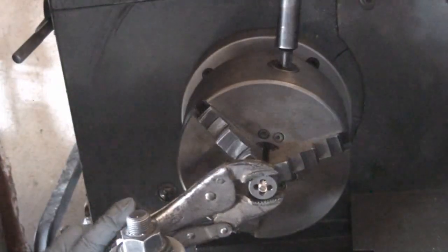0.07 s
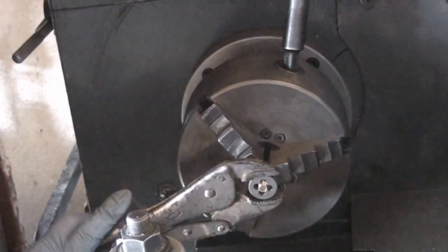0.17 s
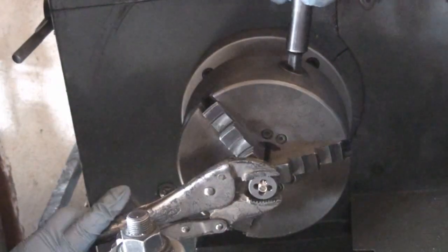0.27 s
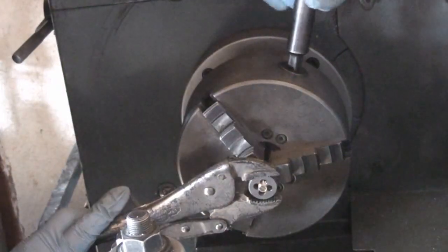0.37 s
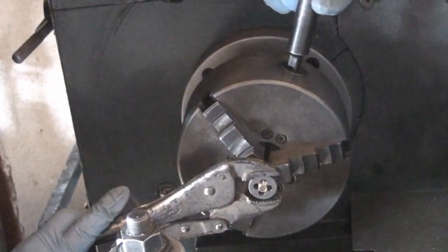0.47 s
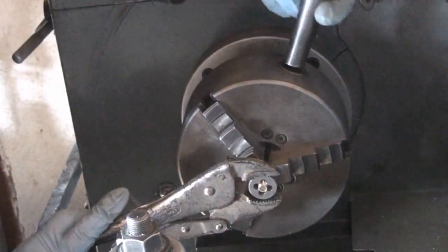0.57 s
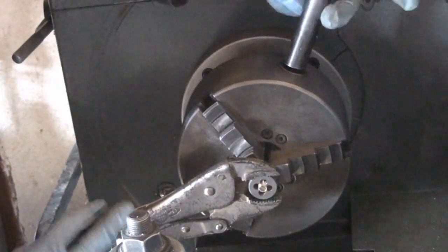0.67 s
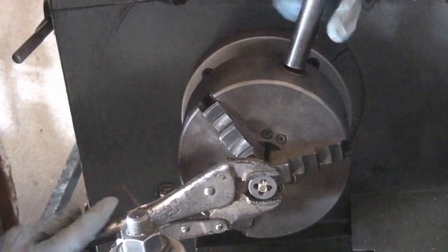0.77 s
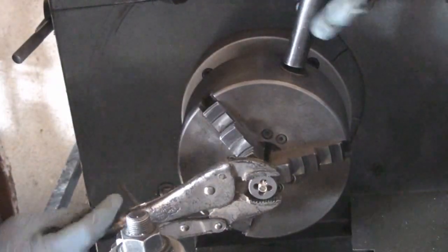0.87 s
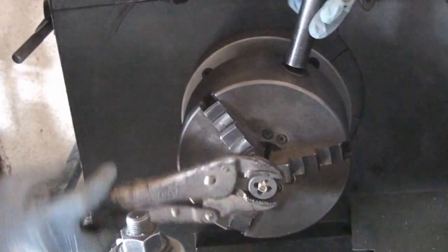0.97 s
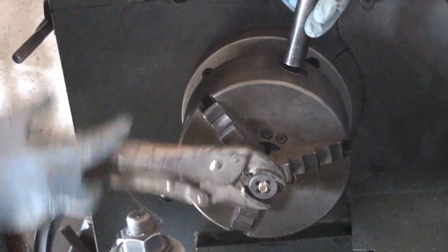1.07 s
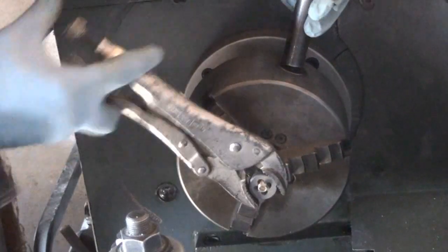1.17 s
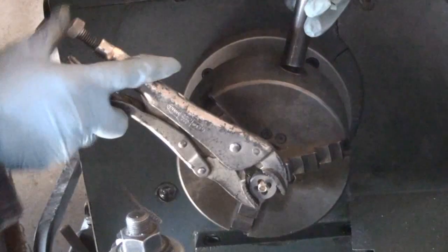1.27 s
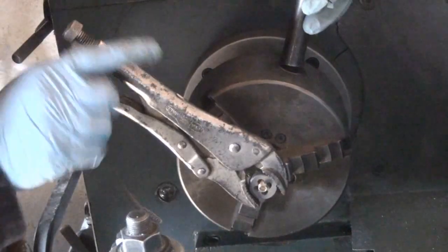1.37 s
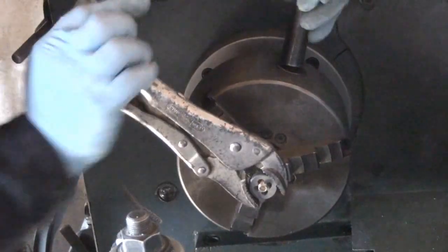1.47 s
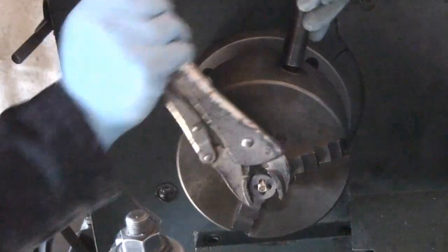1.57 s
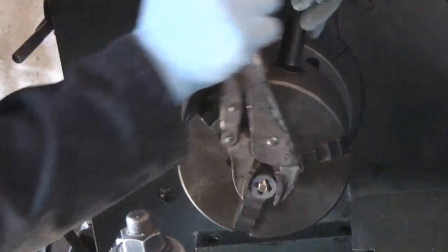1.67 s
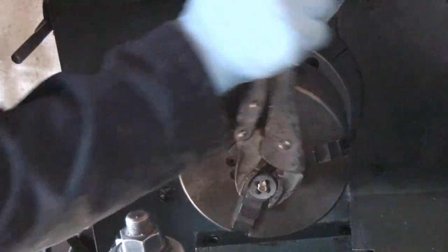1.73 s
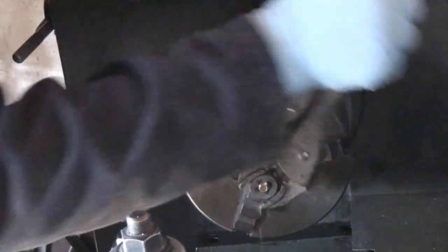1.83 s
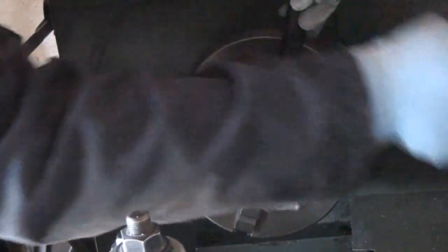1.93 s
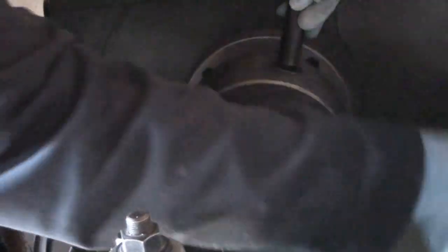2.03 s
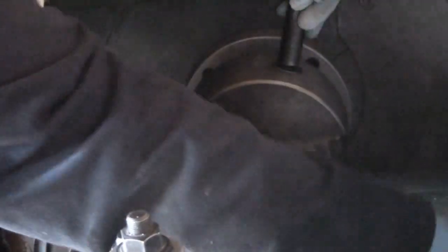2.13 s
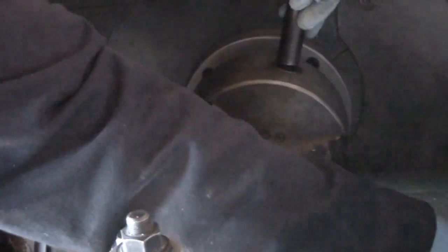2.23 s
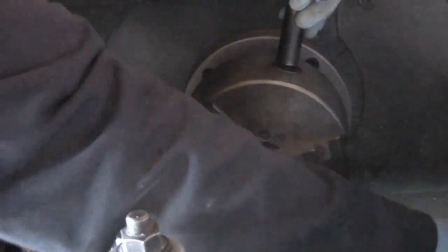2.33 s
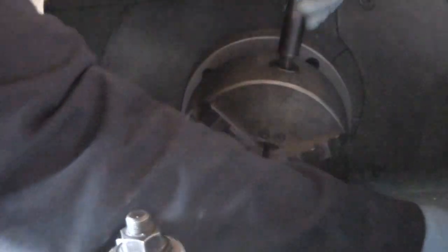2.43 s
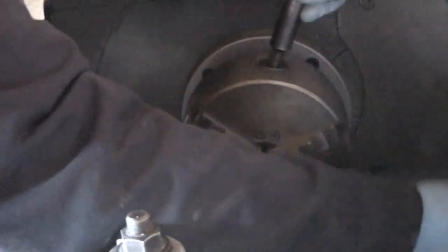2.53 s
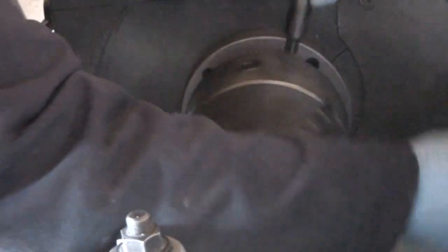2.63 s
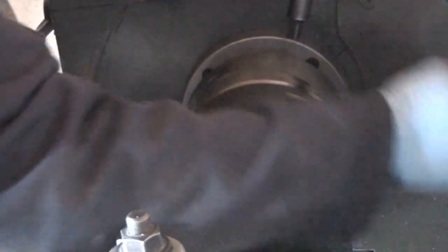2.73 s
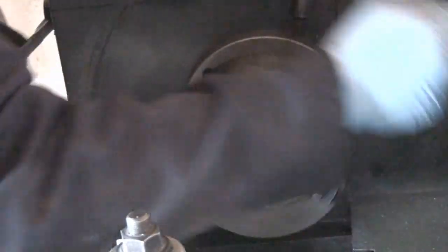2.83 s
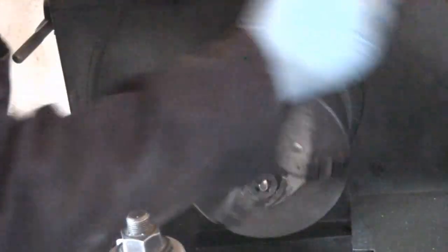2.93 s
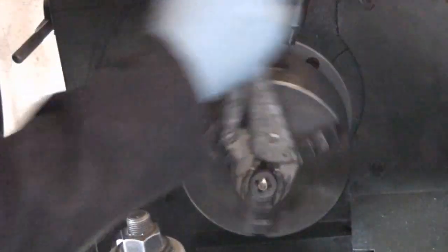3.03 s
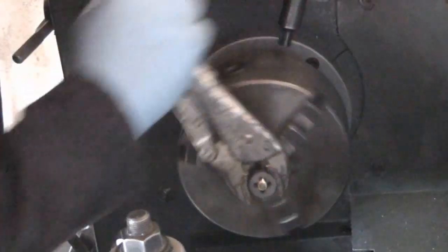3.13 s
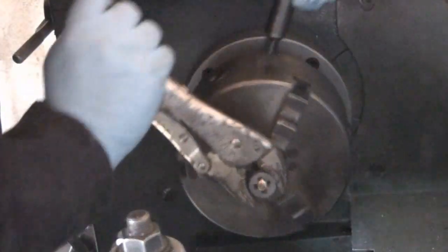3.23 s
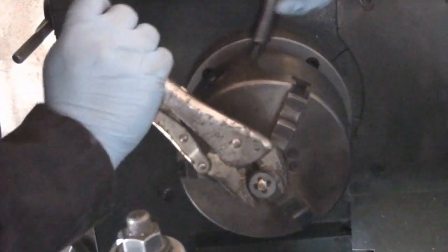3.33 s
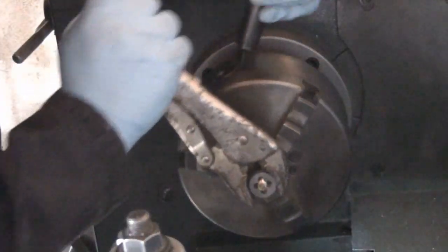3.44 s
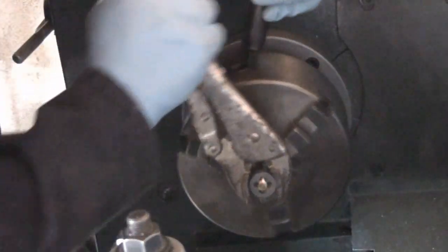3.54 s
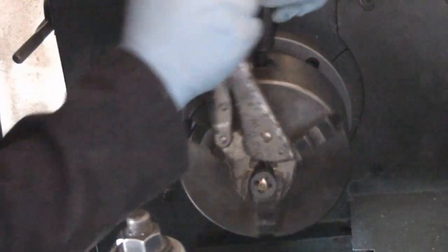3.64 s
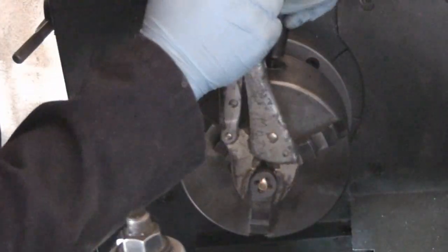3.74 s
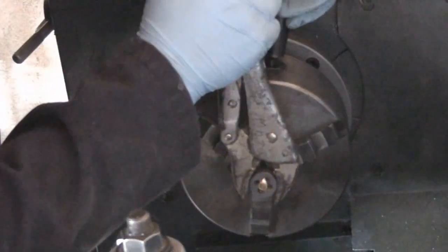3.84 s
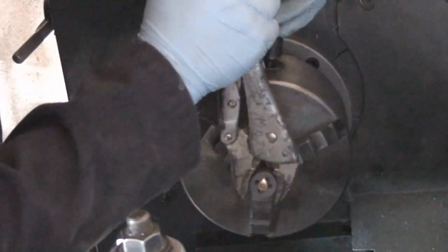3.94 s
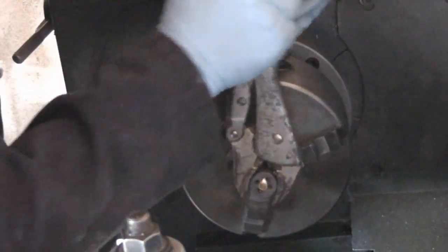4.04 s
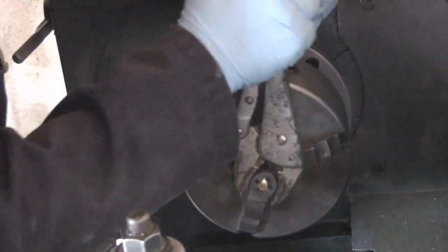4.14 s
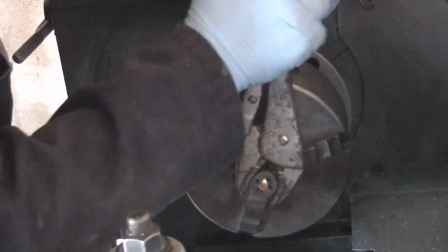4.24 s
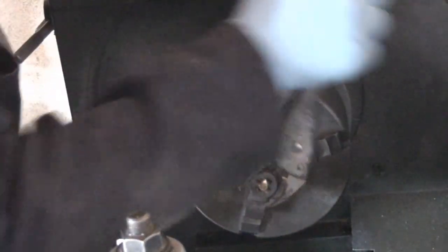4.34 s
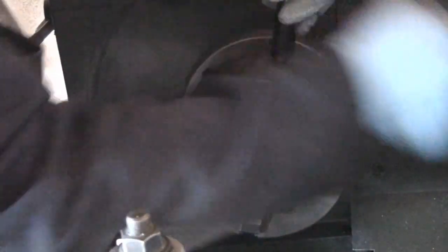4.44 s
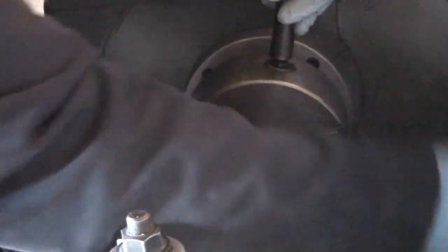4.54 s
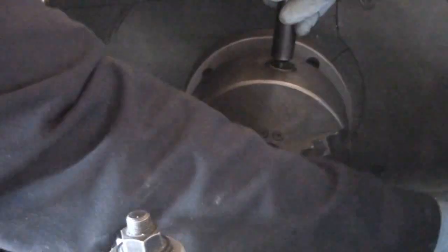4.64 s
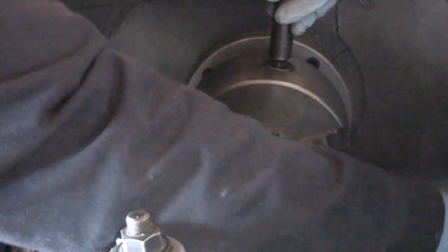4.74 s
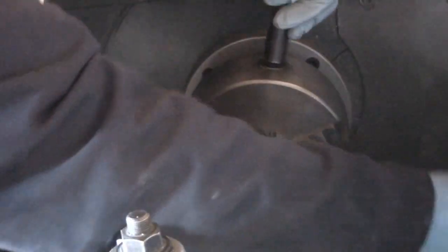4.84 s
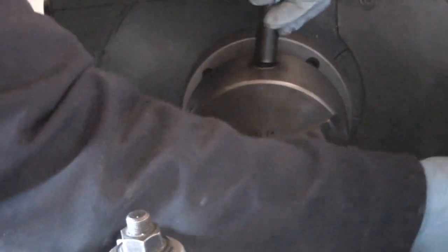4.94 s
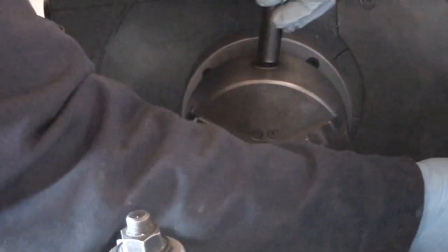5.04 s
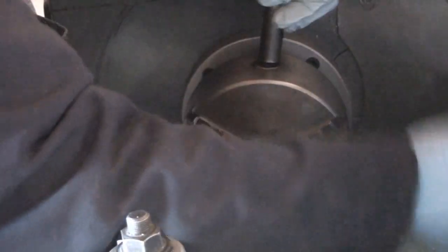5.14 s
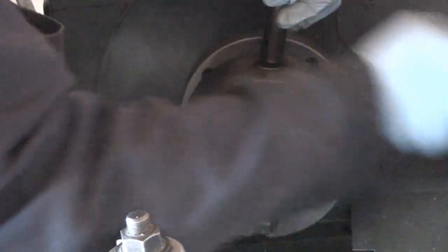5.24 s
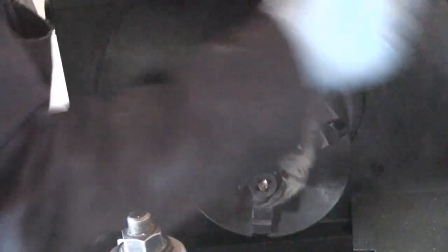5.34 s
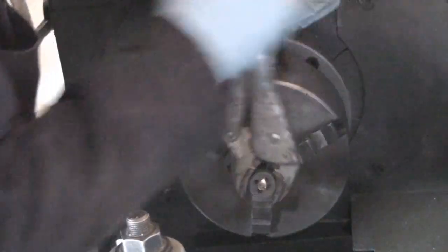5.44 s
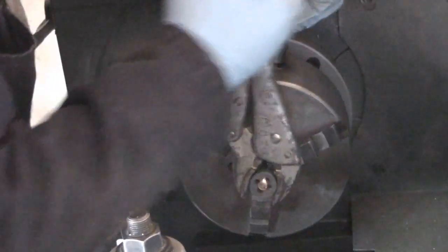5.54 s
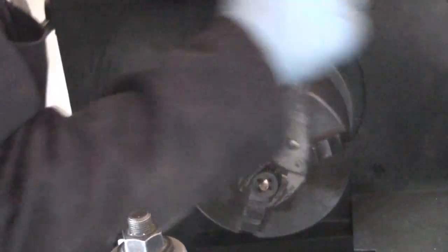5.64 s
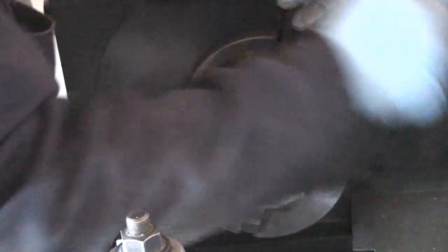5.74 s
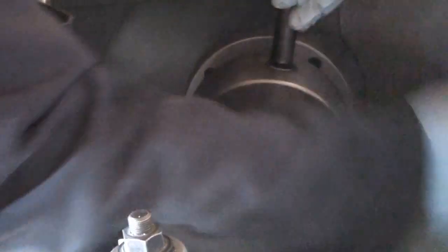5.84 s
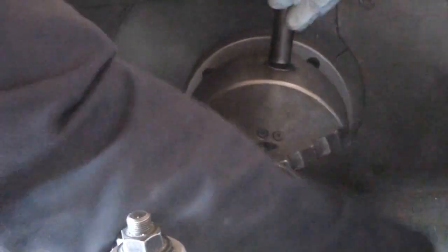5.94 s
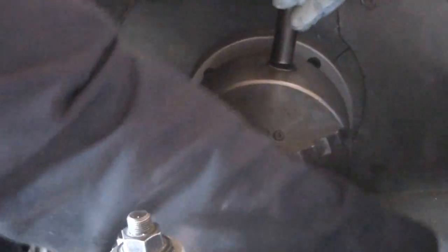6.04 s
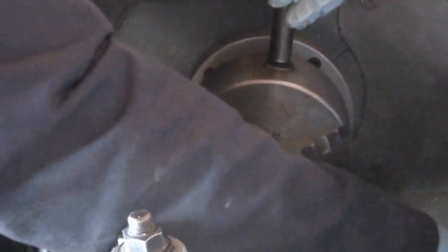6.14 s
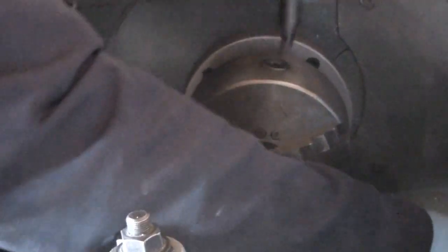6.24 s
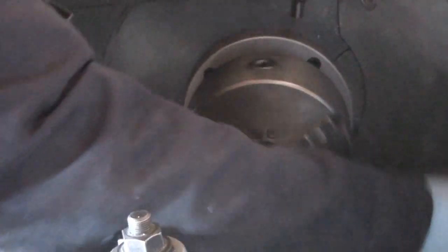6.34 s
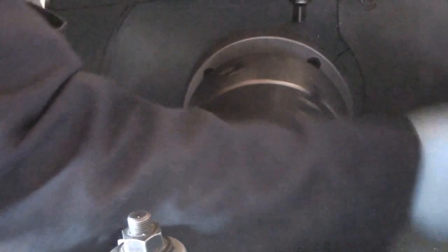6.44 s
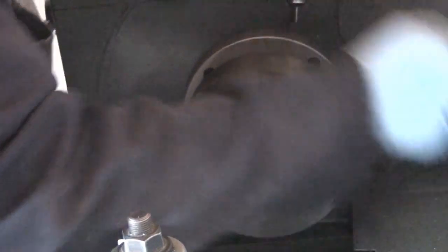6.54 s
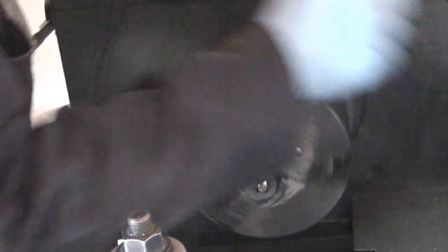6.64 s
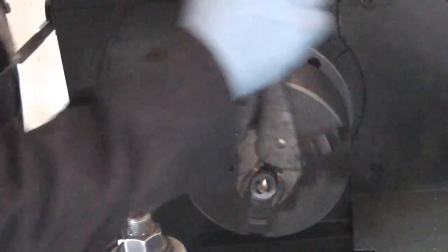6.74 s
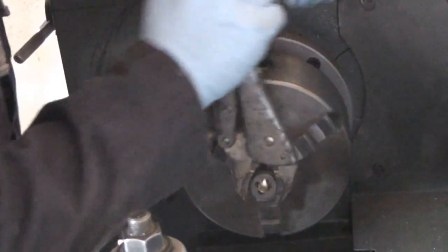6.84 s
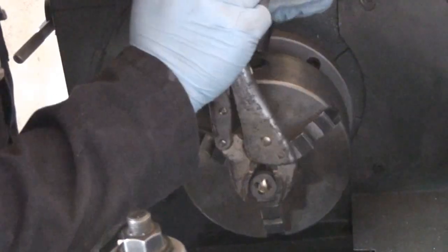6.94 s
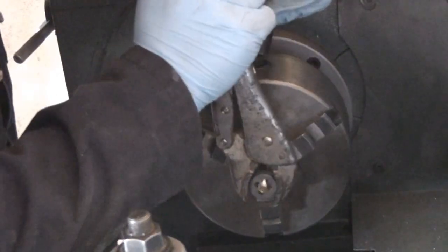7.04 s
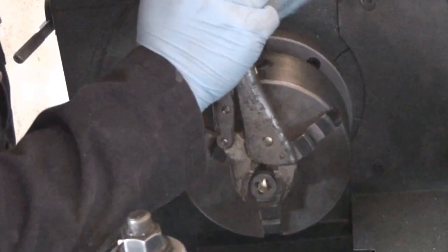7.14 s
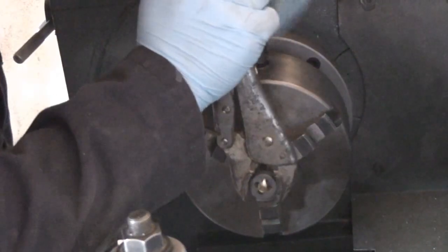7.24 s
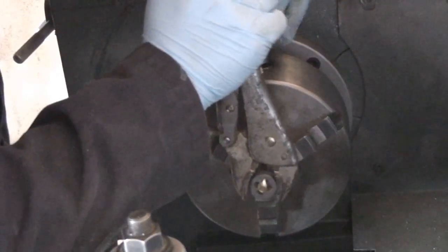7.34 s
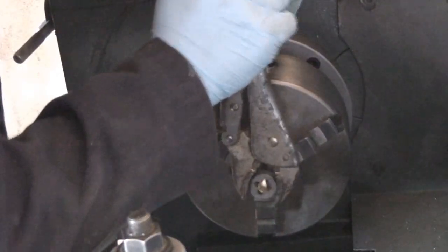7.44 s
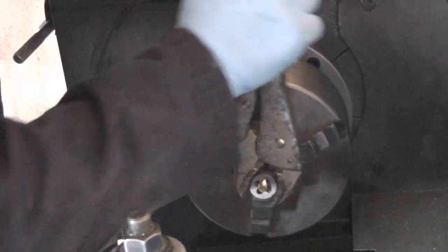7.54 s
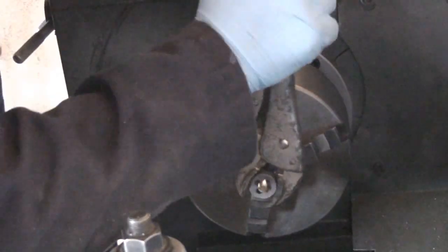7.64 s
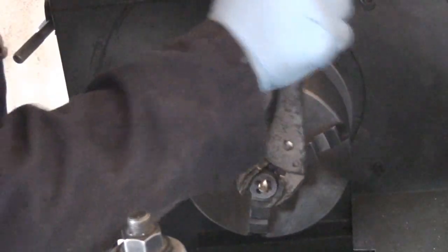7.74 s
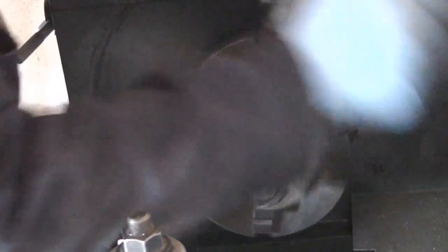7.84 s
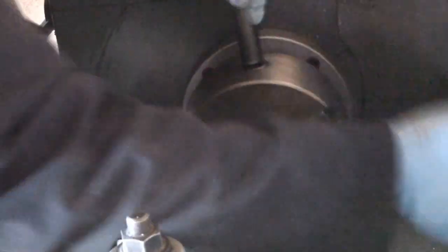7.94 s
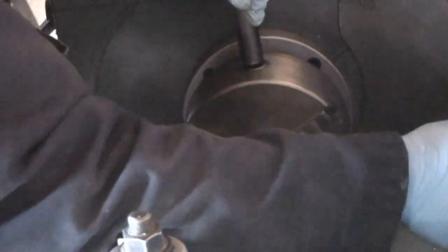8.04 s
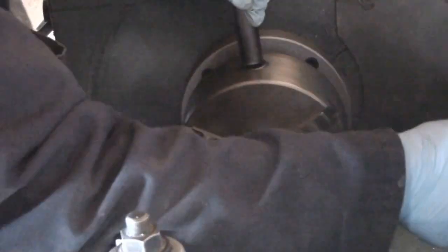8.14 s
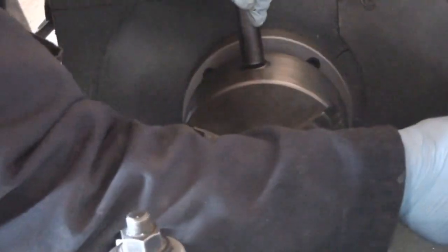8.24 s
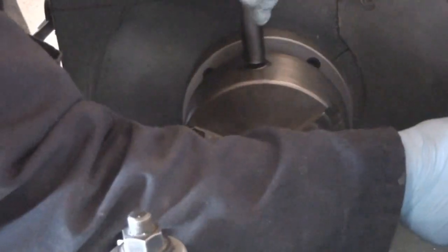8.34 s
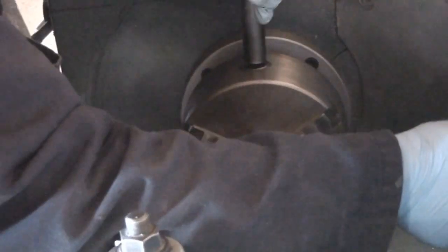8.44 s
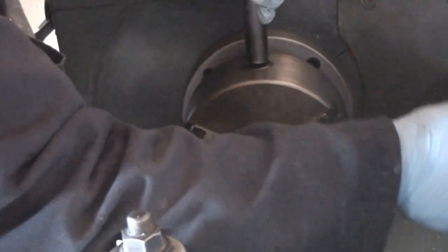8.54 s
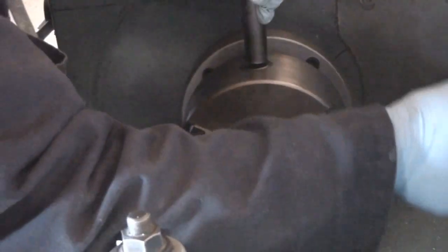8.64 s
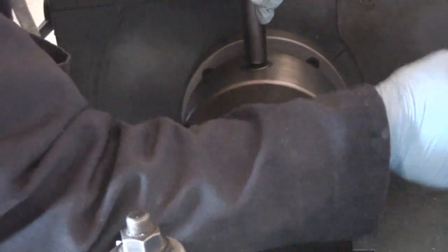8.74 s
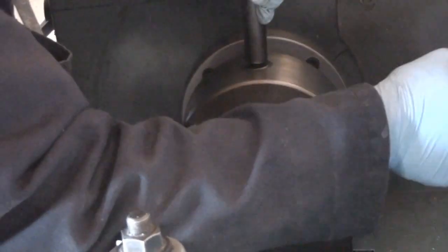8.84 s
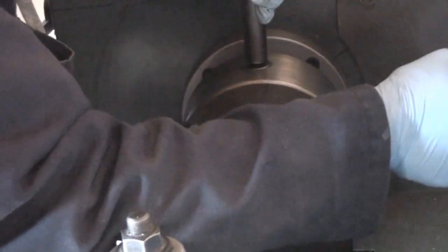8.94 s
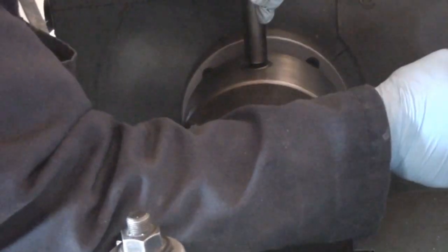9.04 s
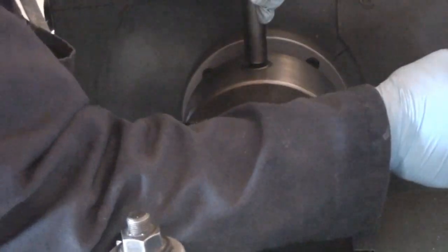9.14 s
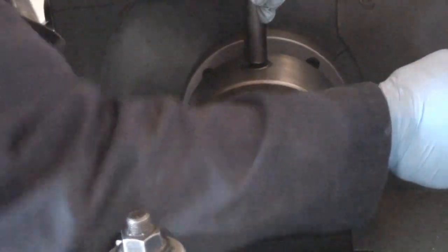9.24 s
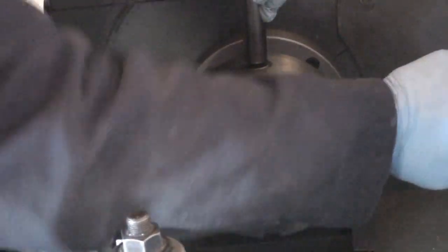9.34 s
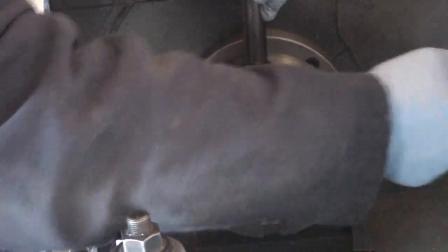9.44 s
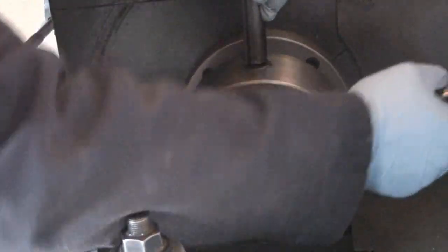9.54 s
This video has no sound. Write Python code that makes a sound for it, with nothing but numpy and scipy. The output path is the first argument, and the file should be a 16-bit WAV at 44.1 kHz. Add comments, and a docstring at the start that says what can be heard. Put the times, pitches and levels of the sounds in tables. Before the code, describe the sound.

Dry metal threading squeals and rasps in five short harsh strokes, with sharp steel clacks and faint glove rubs between, in a small humming workshop.

```python
"""A small, humming workshop: a threading die, gripped in locking pliers, is turned dry onto a chucked brass rod.
In five strokes the edges stick and slip: scattered slips rasp, and between them partials of one pitch sing.
The pitches bend with the hand's push. Struck steel is a decaying noise crack plus a boom of the lathe's casing;
the chuck key rings in decaying sines. Swells of coloured noise make glove and sleeve; air and a motor lie below."""
import sys
import numpy as np
from scipy import signal
from scipy.fft import rfft, irfft, next_fast_len
from scipy.io import wavfile
from scipy.ndimage import uniform_filter1d, map_coordinates

SR = 44100
rng = np.random.default_rng(int(sys.argv[2]) if len(sys.argv) > 2 else 0)


def store_wav(level_fs):
    """Save 16-bit WAV to argv[1]."""
    pcm = np.round(np.clip(np.atleast_2d(level_fs), -1, 1) * 32767)
    wavfile.write(sys.argv[1], SR, pcm.T.astype(np.int16))


N = 423360  # samples, 9.6 s

# Locked slips that sing: start_s, end_s, pitch_hz at the middle, sag_share at both ends (negative rises),
# level_db, tilt_db_per_octave, favoured_mode_hz
LOCKED_TONES = [(1.083, 1.131, 2076, 0.0033, -17, 5, 8770), (1.177, 1.193, 1590, -0.014, -16, 1.5, 10700),
                (1.194, 1.211, 2055, -0.0038, -15.5, 0.5, 8430),
                (1.223, 1.265, 3487, .014, -17.5, -4.5, 10450),
                (1.684, 1.734, 659.6, -0.019, -15, 3.5, 9100), (1.737, 1.8, 1589, 0.0075, -14, 2.5, 9630),
                (1.865, 1.882, 970, 0, -17, -1.5, 10120), (1.922, 1.971, 1588, 0.0069, -14, 2, 4800),
                (1.961, 2.047, 2120, 0.047, -15.5, 1, 8470), (2.04, 2.1, 2046, -0.00013, -15.5, 3, 4084),
                (2.083, 2.133, 2082, 0.016, -14.5, 2.5, 4090), (2.166, 2.24, 1584, .002, -10, 0.5, 9500),
                (4.408, 4.467, 994.4, -0.008, -13, 1, 6000), (4.448, 4.515, 1568, -0.02, -11.5, 1, 4760),
                (4.517, 4.565, 2162, -0.0084, -13, 4, 8574), (4.627, 4.67, 2267, .008, -14.5, 1.5, 6785),
                (4.65, 4.684, 2139, -0.01, -16, 0.2, 10350), (4.693, 4.72, 1603, -0.04, -5.5, 2.45, 4790),
                (5.261, 5.282, 2431, -0.0072, -11, -3.5, 4924), (5.283, 5.344, 2522, .005, -9.5, -3, 5240),
                (5.349, 5.359, 1600, 0.0083, -16, 9, 4800), (5.369, 5.418, 1100, -0.023, -14.5, 2, 5505),
                (5.465, 5.506, 1105, -0.0059, -15, 3.2, 11120), (5.51, 5.549, 1197, -0.013, -14.5, 1, 4853),
                (5.777, 5.829, 1688, -.003, -13, 0.5, 5070), (5.848, 5.916, 1775, -0.019, -10, 1.5, 7300),
                (5.904, 5.984, 1947, .002, -13, -2.5, 9920), (5.991, 6.03, 3296, 0.0016, -12, -3.5, 3325)]
# Strokes of the hand: start_s, end_s, slip_rate_hz at the ends, slip_rate_hz at full push,
# level_db, tilt_db_per_octave
HAND_STROKES = [(1.048, 1.325, 1560, 1845, -16.5, -0.5), (1.638, 2.296, 1012, 944.7, -16.5, -1),
                (4.389, 4.743, 1031, 1727, -15.5, -1.5), (5.25, 5.596, 1192, 1095, -15, -3),
                (5.746, 6.07, 1644, 1687, -17, -3)]
PUSH_BEND = .02  # share by which a lock's pitch rises from no push to full push
DROOP, DROOP_S = .01, 0.0045  # a lock's pitch droops just before it breaks: share, time constant
# How die, rod and pliers radiate: freq_hz, gain_db
TOOL_RESPONSE = [(200, -53), (450, -43), (900, -28), (1500, -24.5), (2000, -15.5), (2800, -17), (3300, -16),
                 (4300, -6), (4900, -5.5), (5600, -7), (7400, -7.5), (9300, -3.5), (12000, -12.5),
                 (14300, -14), (16000, -28.5)]
# Narrow peaks and notches of the tool: centre_hz, half_width_hz, lift_db
TOOL_MODES = [(1240, 40, 8.5), (1580, 72, 8.5), (2040, 53, 0.5), (2310, 270, -8.5), (3740, 53, -3.5),
              (4812, 63, 5), (4967, 120, 5), (6360, 100, 4.5), (7450, 150, -3.5), (7770, 170, 4),
              (8880, 410, 3.5), (9400, 180, 3), (11030, 420, 5.5)]

# Knocks of pliers, die and key: start_s, crack_db before crack_db trim, mode_hz, mode_lift_db,
# jolt_db of the lathe before jolt_db trim
KNOCKS = [(.003, -22.5, 2600, 13.5, -24), (.044, -11.5, 8150, 5.5, -33.5), (.049, 0.5, 6790, 4, -20),
          (.419, -28, 8000, 2, -67.5), (.551, -29.5, 3670, 5, -33.5), (.699, -4, 10900, 11, -21),
          (.719, -1, 10550, 12.5, -18), (.727, -14, 8450, 7.5, -20.5), (1.61, -29.5, 1470, 9.5, -32.5),
          (2.569, -26, 6870, 11, -49), (2.695, -35.5, 8330, 0, -36.5), (3.619, -14, 3880, 1.5, -24.5),
          (3.706, -29.5, 3200, 8, -27), (3.722, -19.5, 3400, 13, -41), (3.748, -8.5, 3560, 10, -35),
          (3.756, -5, 8150, 14, -17), (3.827, -18.5, 6480, 13.5, -22.5), (4.039, -34.5, 6520, -5, -30),
          (4.148, -33, 3040, 11.5, -29.5), (4.937, -15.5, 4870, 13, -19), (5.732, -25.5, 4370, 3.5, -25.5),
          (6.306, -24.5, 3170, -3, -35), (7.026, -9, 3630, 17.5, -23), (7.083, -17, 2200, -5, -23),
          (7.095, -15, 7900, 8, -37), (7.364, -26.5, 1490, -11, -22.5), (7.379, -17, 5460, 3, -20),
          (7.99, -19, 3420, 15, -27), (8.385, -24, 1390, 5.5, -33), (9.403, -26, 1500, 13, -35.5)]
# The knock that ends every stroke: the columns of KNOCKS without start_s
STROKE_END_KNOCK = (-20, 5006, 2, -33.5)
# Faint play in the pliers' joints: the same columns as STROKE_END_KNOCK
JOINT_TICK = (-36, 6500, 3.5, -50)
# When the joints tick: start_s
JOINT_TICK_TIMES = [.352, .377, 2.44, 3.045, 3.46, 6.25, 6.355]
EDGE_HZ, EDGE_PER_MODE = 4100, 0.59  # a higher mode keeps more treble: edge = 4100 Hz + 0.59 * mode
# Colour of struck steel: freq_hz, level_db
STEEL_COLOUR = [(200, -18), (600, -16), (1500, -8), (3500, -4.5), (5000, -7), (7000, 2.5), (10000, 3.5),
                (16000, -11.5)]
# Colour of the jolted lathe: freq_hz, level_db
CASING_COLOUR = [(29, -53.5), (50, -22), (65, -22), (97, -7), (162, -9), (229, -3), (265, -5.5), (383, 0),
                 (468, -10.5), (688, -15.5), (768, -16), (1750, -16), (2110, -19.5), (4000, -31),
                 (5200, -57), (8800, -120)]
# The chuck key shifts in its socket: start_s, level_db, shank_db relative to that level
KEY_SHIFTS = [(4.939, -42.5, -14), (7.99, -35, -44.5), (8.085, -46, -40), (8.387, -35, -42),
              (9.403, -37.5, -44)]
# Ringing modes of the key's bar: freq_hz, level_db, t60_s
KEY_MODES = [(519, -10.5, .25), (1466, -11, 0.13), (2926, 3, 0.061), (4907, 3.5, 0.042),
             (7300, -7.5, 0.057), (10060, -14.5, 0.047)]

# Glove rubbing on the handle: peak_s, level_db, spread_s
GLOVE_RUBS = [(.26, -49.5, 0.043), (1.87, -50, 0.05), (2.19, -56, 0.045), (3.543, -44.5, 0.044),
              (4.13, -46.5, 0.029), (8.003, -45, 0.033), (8.1, -45.5, 0.021), (8.194, -48.5, 0.038)]
# Colour of the glove: freq_hz, level_db
GLOVE_COLOUR = [(240, -47), (400, -6.5), (943, 1), (1350, -4), (1870, -7.5), (2290, -19), (4000, -25),
                (5200, -65), (8800, -120)]
# The sleeve swishes as the arm swings: peak_s, level_db, spread_s
SLEEVE_SWISHES = [(.35, -55.5, 0.06), (.9, -53.5, 0.1), (1.5, -53, 0.15), (2.38, -57, 0.11),
                  (3.17, -68, .08), (7.62, -60, 0.029), (8.03, -55, 0.04), (9.58, -53.5, 0.077)]
SLEEVE_REST_DB = -68  # its faint sliding underneath
# Colour of the sleeve's cloth: freq_hz, level_db
CLOTH_COLOUR = [(1180, -46), (2000, -22), (3280, -11), (3710, -12), (4570, -11), (9830, -7), (16000, -18.5)]

# Workshop air over time: time_s, rumble_db, wash_db
AIR_LEVELS = [(0, -59, -67), (1.2, -61, -61), (2.5, -66.5, -62.5), (2.9, -57, -58), (4.2, -53.5, -66),
              (4.6, -63, -65), (6.2, -58, -55.5), (8.4, -53, -63), (8.9, -61, -64.5), (9.5, -63, -59.5)]
# Colour of the rumble: freq_hz, level_db
RUMBLE_COLOUR = [(15, -43.5), (30, -17.5), (40, 1.5), (52, 0.5), (66, -21), (90, 0), (120, -9.5), (175, -4),
                 (250, -14), (400, -21), (700, -61)]
# Colour of the wash: freq_hz, level_db
WASH_COLOUR = [(150, -33.5), (250, -12.5), (319, -10), (444, -5), (501, -6), (662, -9), (1060, -13),
               (1500, -11.5), (2050, -14.5), (2280, -19.5), (3120, -19.5), (9010, -28.5), (16000, -39)]
# A distant motor over time: time_s, level_db
MOTOR_LEVELS = [(0, -71), (6, -64), (7, -53), (9.2, -62.5), (9.6, -78)]
# Decay of the workshop's tail: freq_hz, t60_s
ROOM_DECAY = [(200, 0.32), (1500, 1), (4000, 0.29), (8000, 0.14), (15000, 0.073)]

# Stereo lean of the tool: freq_hz, left_minus_right_db
STEREO_LEAN = [(200, -0.2), (1300, -1.1), (2400, -1), (4400, -2), (8100, -2.4), (15000, 1)]
# Stereo timing of the tool: freq_hz, left_lead_radians (negative: left is later)
STEREO_LEAD = [(100, -.03), (520, -.25), (2000, -0.72), (4800, -0.58), (6600, -.1), (8500, -.07),
               (11000, -0.036)]
HISS_DB = -76  # the microphone's steady hiss
# Colour of the hiss: freq_hz, level_db
HISS_COLOUR = [(300, -6), (3000, 0), (16000, 0)]
TOP_HZ = 16000  # nothing is kept from here up


def squeal(sway=0.0005, waver=0.0023, lift_db=7, mode_width_hz=350, flutter_db=1.15,
           rise=.004, release_t60=.035, size=8192):
    """Locked slips sing, bending with the push; also returns how firmly the locks hold, 0-1."""
    out, held, t = np.zeros(N), np.zeros(N), np.arange(size) / SR
    for start, end, hz, sag, db, tilt_db, mode_hz in LOCKED_TONES:
        length = end - start
        arch = (2 * np.minimum(t / length, 1) - 1) ** 2  # 1 at both ends, 0 in the middle
        bend = PUSH_BEND * (push(start + t) - push((start + end) / 2)) - sag * arch
        bend -= DROOP * np.exp(np.minimum(t - length, 0) / DROOP_S)
        unsteady = sway * wobble(31, size) + waver * wobble(160, size)
        cycle = slip_cycle(hz * (1 + bend + unsteady))
        tone = filtered(cycle, lambda f: radiated(f, tilt_db) * amp(lift_db * bump(f, mode_hz, mode_width_hz)))
        tone = unit(torn(tone, patchy_db=3.0))
        swell = gate(t, length, rise, release_t60)
        level = amp(db + flutter_db * wobble(60, size))
        add(out, start - rise / 2, level * swell * tone)
        add(held, start - rise / 2, swell ** 2)
    return out, np.minimum(held, 1)


def rasp(held, rough=0.62, stumble=.014, wander=.012, cut_hz=1700, cycle_cut_hz=2300, under_lock_db=-21,
         ease_db=3, ease_s=0.0078, flutter_db=0.9, rise=.002, release_t60=0.037, size=36000):
    """A stumbling stick-slip cycle mixes with edges letting go at scattered times; locks push it down."""
    out, t = np.zeros(N), np.arange(size) / SR
    for start, end, ends_hz, full_hz, db, tilt_db in HAND_STROKES:
        length = end - start
        rate = ends_hz + (full_hz - ends_hz) * push(np.minimum(start + t, end)) ** 2
        cycle = slip_cycle(rate * (1 + stumble * wobble(160, size) + wander * wobble(25, size)))
        cycle = filtered(cycle, lambda f: radiated(f, tilt_db) * (f / np.hypot(f, cycle_cut_hz)) ** 2)
        # on average six scattered slips per cycle
        slips = (rng.random(size) < 6 * rate / SR) * rng.uniform(0.26, 1, size)
        slips = slips - slips.mean()
        slips = filtered(slips, lambda f: radiated(f, tilt_db) * (f / np.hypot(f, cut_hz)) ** 2)
        cycle = unit(torn(cycle, patchy_db=6.5))
        slips = unit(torn(slips, patchy_db=5.5))
        mix = np.sqrt(1 - rough) * cycle + np.sqrt(rough) * slips
        ease = ease_db * np.exp(np.minimum(t - length, 0) / ease_s)  # softens as the stroke ends
        level = amp(db + flutter_db * wobble(90, size) - ease)
        add(out, start - rise / 2, level * gate(t, length, rise, release_t60) * mix)
    return out * np.sqrt(1 - held + held * amp(under_lock_db) ** 2)


def push(t):
    """The hand's push arches from 0 to 1 and back over each stroke."""
    return sum(np.sin(np.pi * np.clip((t - start) / (end - start), 0, 1)) for start, end, *_ in HAND_STROKES)


def slip_cycle(pitch):
    """Stick-slip repeats as equally strong partials up to the band's top, in random phases."""
    k = np.arange(1, int(SR / 2 / pitch.max()) + 1)[:, None]
    turns = k * np.cumsum(pitch) / SR + rng.random(k.shape)
    return np.sin(2 * np.pi * turns).sum(0)


def radiated(hz, tilt_db):
    """Die, rod and pliers radiate through their modes, with the treble tilted around 7 kHz."""
    modes = sum(peak * bump(hz, centre, width) for centre, width, peak in TOOL_MODES)
    tilt = tilt_db * np.log2(np.maximum(hz, 3000) / 7000)
    return amp(along(TOOL_RESPONSE, hz) + modes + tilt)


def torn(x, patchy_db):
    """Energy hops between neighbouring bands within milliseconds."""
    z = signal.stft(x, nperseg=256)[2]
    field = uniform_filter1d(rng.standard_normal(z.shape), size=3, axis=0)  # across bands
    field = unit(uniform_filter1d(field, size=4, axis=1))  # across time
    return signal.istft(z * amp(patchy_db * field), nperseg=256)[1][:len(x)]


def clacks(crack_t60=0.061, crack_db=-10, rise=0.0013, mode_width_hz=260,
           jolt_db=-13, jolt_t60=0.53, jolt_rise=0.0037):
    """Steel strikes steel: a crack that favours one mode of the pliers, then the lathe's casing booms."""
    steel, boom, t = np.zeros(N), np.zeros(N), np.arange(SR // 2) / SR
    stops = [(end, *STROKE_END_KNOCK) for start, end, *_ in HAND_STROKES]
    ticks = [(s, *JOINT_TICK) for s in JOINT_TICK_TIMES]
    for s, db, mode_hz, lift_db, lathe_db in list(KNOCKS) + stops + ticks:
        edge_hz = EDGE_HZ + EDGE_PER_MODE * mode_hz
        colour = lambda hz: amp(lift_db * bump(hz, mode_hz, mode_width_hz)) / np.sqrt(1 + (hz / edge_hz) ** 8)
        crack = unit(filtered(noise(STEEL_COLOUR, len(t)), colour))
        add(steel, s, amp(db + crack_db - 60 * t / crack_t60) * (1 - np.exp(-t / rise)) * crack)
        # the casing's high modes die sooner than its low ones
        casing = noise(CASING_COLOUR, len(t))
        low = filtered(casing, lambda hz: 1 / (1 + (hz / 900) ** 4))
        casing = low + (casing - low) * amp(-60 * t / 1.9)
        add(boom, s, amp(lathe_db + jolt_db - 60 * t / jolt_t60) * (1 - np.exp(-t / jolt_rise)) * casing)
    return steel, boom


def chuck_key(rise=.0005, shank_hz=4990, shank_t60=0.99):
    """The key's bar rings briefly in decaying modes; its shank sings on for longer."""
    out, t = np.zeros(N), np.arange(SR // 2) / SR
    for s, db, shank_db in KEY_SHIFTS:
        ring = np.zeros(len(t))
        for hz, level_db, t60 in list(KEY_MODES) + [(shank_hz, shank_db, shank_t60)]:
            decay = amp(level_db + rng.normal(0, 1) - 60 * t / t60)
            ring += decay * np.sin(2 * np.pi * hz * t)
        add(out, s, amp(db) * (1 - np.exp(-t / rise)) * ring)
    return out


def handling(crease_db=1.0, grab_db=2.5):
    """The glove grabs and slides on the handle, and the sleeve moves with the arm: fluttering noise."""
    glove = unit(torn(noise(GLOVE_COLOUR, N), patchy_db=4) * amp(grab_db * wobble(110, N)))
    sleeve = amp(crease_db * wobble(64, N)) * wide(CLOTH_COLOUR, side_db=-13.5)
    sleeve_level = amp(SLEEVE_REST_DB) + swells(SLEEVE_SWISHES)
    return swells(GLOVE_RUBS) * glove + sleeve_level * sleeve


def workshop(hum_hz=87, octave_db=-6):
    """Low rumble, a soft wash of air and a distant motor's hum, its pitch unsteady."""
    rumble_db, wash_db = curves(AIR_LEVELS)
    turn = 2 * np.pi * np.cumsum(hum_hz * (1 + 0.033 * wobble(2.1, N))) / SR
    hum = amp(curves(MOTOR_LEVELS)[0]) * unit(np.sin(turn) + amp(octave_db) * np.sin(2 * turn))
    rumble = amp(rumble_db) * wide(RUMBLE_COLOUR, side_db=-16.5)
    drift_db = .6 * wobble(12, N)
    wash = amp(wash_db + drift_db) * wide(WASH_COLOUR, side_db=-3.5)
    return hum + rumble + wash


def room(x, near_db=-14, near_t60=0.23, far_db=-21, side_db=-3):
    """Quick reflections off the lathe and the workshop's tail, both as decaying noise."""
    hz, t, z = signal.stft(rng.standard_normal((2, SR // 2)), SR, nperseg=256)
    far = signal.istft(z * amp(-60 * t / along(ROOM_DECAY, hz)[:, None]), SR, nperseg=256)[1]
    near = rng.standard_normal(far.shape) * amp(-60 * np.arange(far.shape[1]) / SR / near_t60)
    tail = amp(near_db) * near / np.linalg.norm(near[0]) + amp(far_db) * far / np.linalg.norm(far[0])
    delayed = np.pad(x, (80, 0))  # samples, about 2 ms
    mid, side = signal.fftconvolve(delayed[None], tail, axes=1)[:, :N]
    side = filtered(side, lambda hz: amp(along([(5000, -2.0), (12000, -6)], hz)))
    return mid + amp(side_db) * side * np.array([[1], [-1]])


def amp(db):
    """Decibels to gain."""
    return 10 ** (np.asarray(db) / 20)


def unit(x):
    """Scale to rms 1."""
    return x / np.sqrt(np.mean(x ** 2) + 1e-20)


def along(points, hz):
    """Read (freq_hz, value) points on a log frequency axis."""
    f, v = np.transpose(points)
    return np.interp(np.log(hz + 1), np.log(f + 1), v)


def curves(rows):
    """One value per sample for each column after the time."""
    s, *cols = np.transpose(rows)
    return [np.interp(np.arange(N) / SR, s, c) for c in cols]


def wobble(rate, size):
    """A smooth random curve, rate knots a second."""
    return map_coordinates(rng.standard_normal(8192), [np.arange(size) * rate / SR], mode="wrap")


def filtered(x, gain):
    """Shape x by a gain that depends on frequency."""
    n = x.shape[-1]
    m = next_fast_len(n + 4096)
    return irfft(rfft(x, m) * gain(np.fft.rfftfreq(m, 1 / SR)), m)[..., :n]


def bump(hz, centre_hz, width_hz):
    """A resonance's shape, 1 at its centre and half at width_hz away."""
    return 1 / (1 + ((hz - centre_hz) / width_hz) ** 2)


def noise(spectrum, size):
    """Coloured noise of rms 1."""
    return unit(filtered(rng.standard_normal(size), lambda hz: amp(along(spectrum, hz))))


def wide(spectrum, side_db):
    """Stereo noise with a weaker side part."""
    return noise(spectrum, N) + amp(side_db) * noise(spectrum, N) * np.array([[1], [-1]])


def gate(t, length, rise, release_t60):
    """Attack, hold and release."""
    return np.clip(t / rise, 0, 1) * amp(-60 * np.maximum(t - length, 0) / release_t60)


def swells(rows):
    """One smooth rise and fall for each peak_s, level_db, spread_s row."""
    t = np.arange(N) / SR
    return sum(amp(db) * np.exp(-((t - s) / spread) ** 2 / 2) for s, db, spread in rows)


def add(track, s, x):
    """Mix x into the track at time s."""
    i = max(0, round(s * SR))
    track[i:i + len(x)] += x[:max(0, len(track) - i)]


def scene(tone_room_db=-2, rasp_room_db=6.0, knock_room_db=0):
    """The tool sits close by; its middle treble reaches the right side louder and sooner."""
    steel, boom = clacks()
    tones, held = squeal()
    rasping = rasp(held)
    knocks = steel + chuck_key()

    def sides(hz):
        """Half the lean and lead goes to the left, the inverse half to the right."""
        left_over_right = amp(along(STEREO_LEAN, hz)) * np.exp(1j * along(STEREO_LEAD, hz))
        return left_over_right ** np.array([[.5], [-.5]])

    echo = room(amp(tone_room_db) * tones + amp(rasp_room_db) * rasping + amp(knock_room_db) * knocks)
    direct = filtered(tones + rasping + knocks + boom, sides)
    hiss = amp(HISS_DB) * wide(HISS_COLOUR, side_db=-14.5)
    return direct + echo + handling() + workshop() + hiss


def record(dry, drive_db=.5, limit_db=-12, top=0.86):
    """A limiter evens out loud stretches, peaks are rounded off, and the band ends at TOP_HZ."""
    loud = dry * amp(drive_db)
    power = np.abs(uniform_filter1d(np.mean(loud ** 2, axis=0), size=441))  # over 10 ms
    limited = loud / (1 + (power / amp(limit_db) ** 2) ** 4) ** (1 / 8)
    rounded = limited / (1 + (limited / top) ** 4) ** (1 / 4)
    return filtered(rounded, lambda hz: hz < TOP_HZ)


dry = scene()
out = record(dry)
store_wav(out)
```